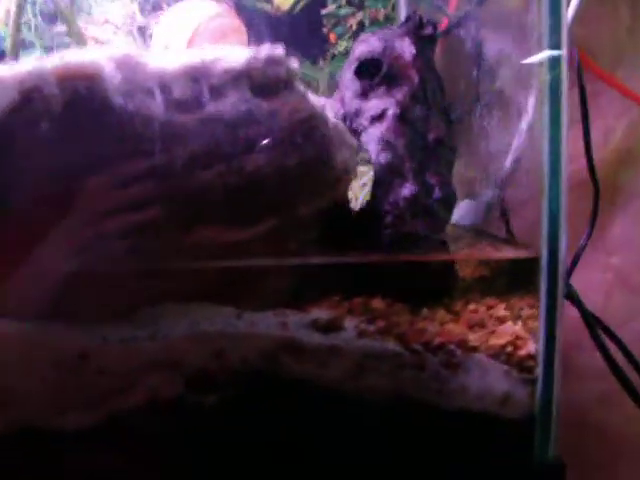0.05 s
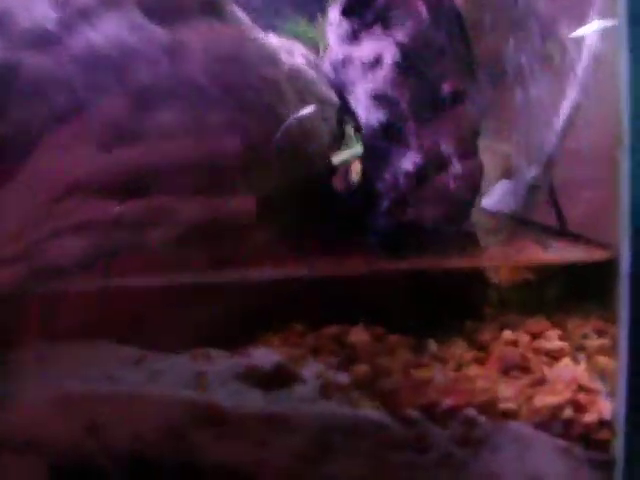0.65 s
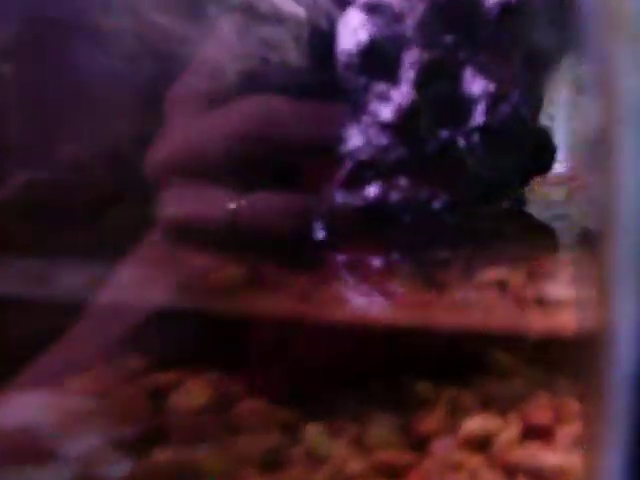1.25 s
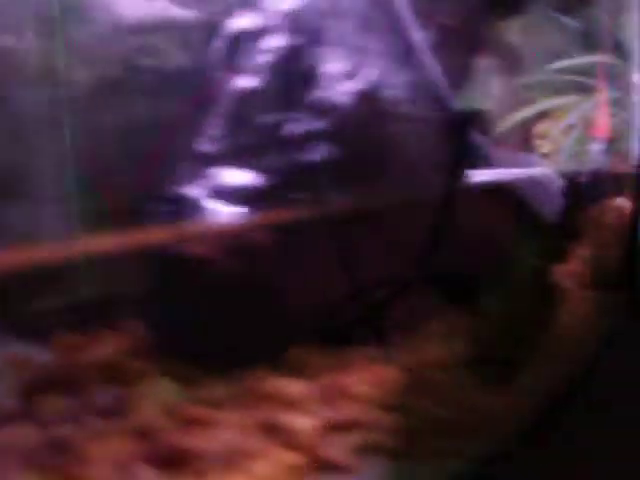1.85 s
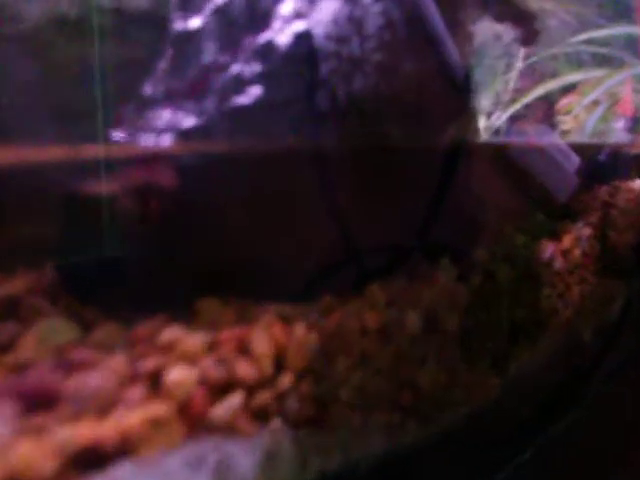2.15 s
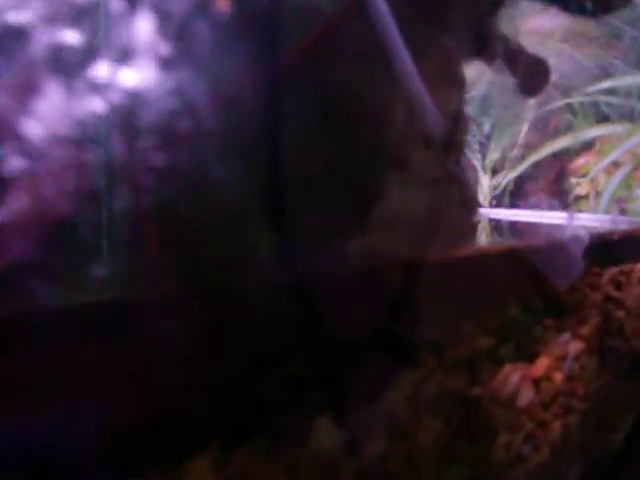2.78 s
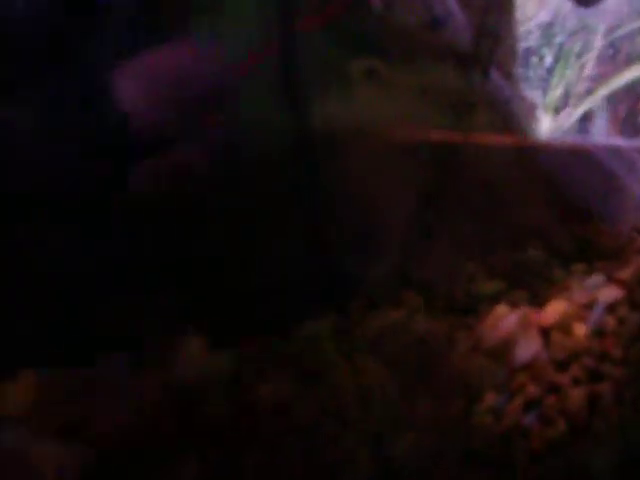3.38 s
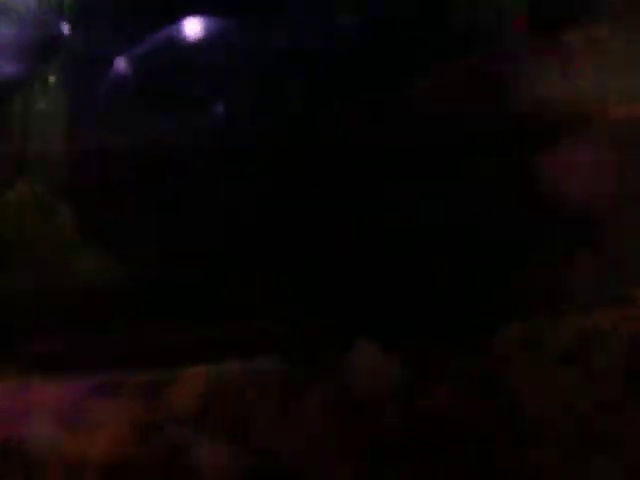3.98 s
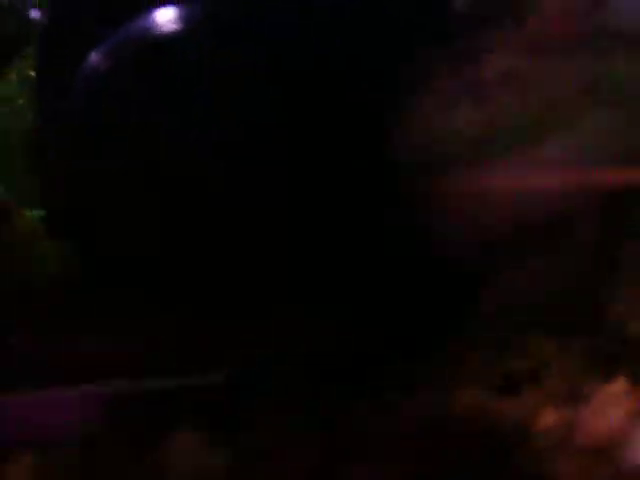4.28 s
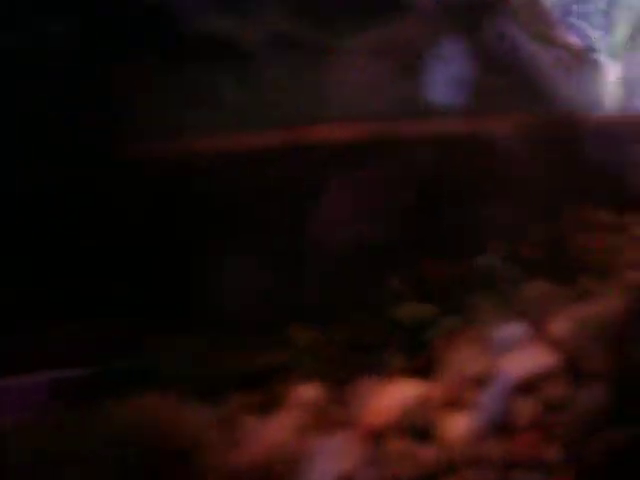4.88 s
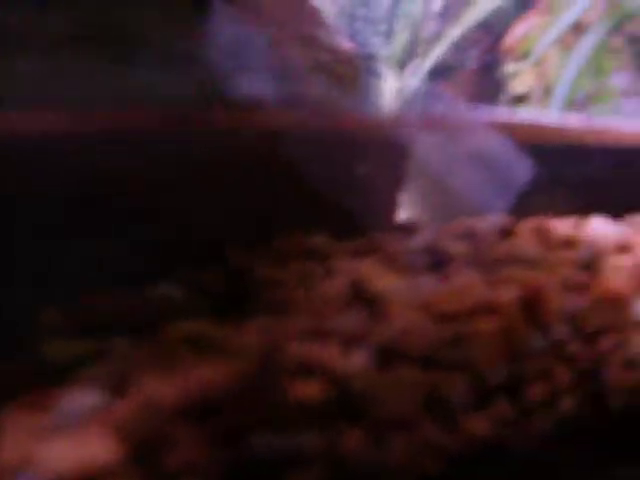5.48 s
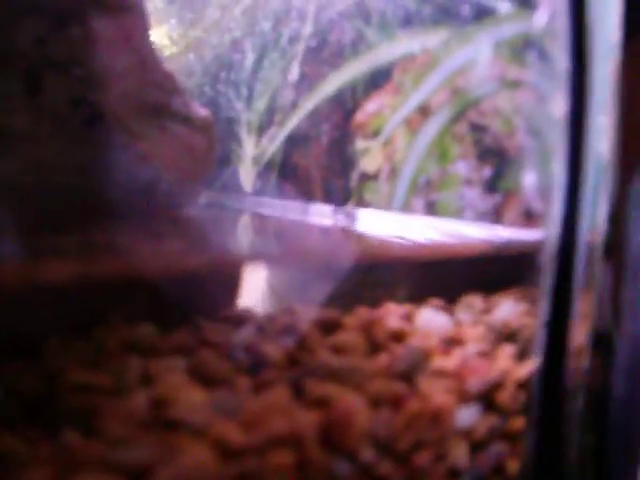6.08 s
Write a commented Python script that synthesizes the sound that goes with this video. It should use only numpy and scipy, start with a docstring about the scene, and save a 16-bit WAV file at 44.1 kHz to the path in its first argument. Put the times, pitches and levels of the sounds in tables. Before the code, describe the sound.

An aquarium pump hums low and steady indoors for about six seconds, while falling water makes a continuous soft, hissy trickle dotted with tiny bubble pings. Both are quiet and close. A light handling tick comes right at the start and another near 1 second. At about 1.4 and 1.5 seconds the handheld microphone bumps the glass tank twice, a sharp double knock with a thud, a crack and a very short ring. It is by far the loudest sound and slightly distorted. The hum swells over the first second or so and again a little near 5 seconds. A single drop snaps into the water at about 2.7 seconds. From 4 to 5.7 seconds there are a few faint ticks and soft finger rubs near the microphone. The trickle and hum continue to the end, and everything sounds slightly dull in the treble.

```python
"""Aquarium filter and a bumped camera

An aquarium pump hums indoors while a small camera moves along the tank. Falling water
hisses, and the air bubbles in it ring with little pings. Fingers rub the camera and its
case ticks in the hand. Twice the camera bumps the tank, which thuds, cracks and rings.
The bumps overload the camera's recorder, which also cuts off the highest treble."""
import sys
import numpy as np
from scipy import signal
from scipy.fft import rfft, irfft
from scipy.io import wavfile
from scipy.ndimage import uniform_filter1d

SR = 44100
rng = np.random.default_rng(int(sys.argv[2]) if len(sys.argv) > 2 else 0)


def persist_wave(psi):
    """Save psi, clipped to +-1, as 16-bit WAV."""
    counts = np.round(np.clip(psi, -1, 1) * 32767).astype(np.int16)
    wavfile.write(sys.argv[1], SR, np.atleast_2d(counts).T)


N = 270774
TIME = np.arange(N) / SR
MAINS_HZ = 60
BUBBLE_FADE = 1.3  # a bubble fades in BUBBLE_FADE / sqrt(pitch_hz) seconds

# Every fade_s below is the time a sound takes to drop by 60 dB.
# The notes in the pump's hum: multiple_of_mains, level_db
HUM_NOTES = [(1, -38), (2, -43.5), (3, -53.5), (4, -68.5), (5, -54.5), (7, -60)]
# Thin tones beside the hum: pitch_hz, level_db
WHINE_TONES = [(561, -69.5), (636, -56), (786, -56.5), (5012, -59.5)]
# The pump is louder when the camera is nearer: time_s, gain_db
PUMP_NEARNESS = [(0, -8.5), (.6, -6.5), (1.3, -.5), (3, .5), (4.4, 1), (5.1, 3.5), (6.14, 3)]
# The flutter of the pump's paddle wheel and housing: frequency_hz, level_db
FLUTTER_SPECTRUM = [(10, -16), (22, -16.5), (30, -7.5), (42, -23), (75, -19.5), (100, -7.5), (116, -14.5),
                    (130, -10), (155, -27.5), (400, -59)]
# How quickly the hum wavers: rate_hz, level_db
WAVER_SPECTRUM = [(1, 0), (8, 0), (25, -40), (100, -120)]
# The hiss of splashing water: frequency_hz, level_db
HISS_SPECTRUM = [(20, -20.5), (150, -8), (220, 1), (310, -1.5), (480, 3.5), (700, -3), (950, -0.5),
                 (1350, -3), (1700, -3.5), (2600, -5), (3400, -4), (4400, -5), (5100, -2.5)]
# The falling water is nearer at both ends of the move: time_s, gain_db
WATER_NEARNESS = [(0, -37), (1.6, -37.5), (4.4, -38), (5.1, -36.7), (6.14, -36)]
# How quickly the flow swells: rate_hz, level_db
SWELL_SPECTRUM = [(.3, -20), (1, 0), (3, 0), (10, -40), (60, -120)]
# Drops hitting the water nearby: start_s, level_db
NEAR_DROPS = [(.644, -17), (2.681, -7.5), (2.692, -19)]
# The clearest bubbles: start_s, level_db, pitch_hz
CLEAR_BUBBLES = [(0.1142, -30, 1100), (.8166, -33, 706), (.849, -25.5, 3490), (2.746, -28.5, 2420),
                 (2.884, -28.5, 2410), (3.114, -28.5, 1440), (3.277, -33, 912), (3.405, -32, 1100),
                 (4.137, -26.5, 1390), (4.412, -24.5, 3920), (5.066, -25, 2130), (5.229, -24, 5100),
                 (5.545, -29.5, 2160), (5.586, -24, 4320), (5.627, -30, 927), (5.949, -24, 3330)]
# Fingers shifting on the case: start_s, length_s, level_db, pitch_hz, width_octaves
FINGER_RUBS = [(4.542, 0.046, -30.5, 3280, 0.7), (4.606, 0.027, -33, 3060, 0.86),
               (4.851, 0.27, -40.5, 463, 0.24), (4.944, 0.074, -34.5, 3800, 1),
               (4.979, 0.088, -31.5, 2600, 1), (5.425, 0.1, -38.5, 800, 0.36),
               (5.705, 0.041, -37, 1980, 0.91)]
# Ticks of the case: start_s, level_db, pitch_hz, width_octaves, fade_s
CASE_TICKS = [(0.0747, -11, 4160, 0.44, 0.0074), (1.0519, -16, 1180, 0.25, 0.012),
              (3.958, -20, 4970, 0.22, .025), (4.062, -23, 3040, .7, .02), (5.184, -13.5, 1350, .9, 0.026),
              (5.429, -16, 4630, 0.41, 0.03), (5.489, -23, 362, 0.27, 0.027)]
# Two bumps, each with its rebounds: start_s, ring_db, thud_db, crack_db
TANK_HITS = [(1.4153, -1, -1.5, 7), (1.4228, -15.5, 1.5, 3), (1.4386, -27, -24, -9.5),
             (1.4793, -0.5, -11, -1), (1.4853, -20, -7.5, -4), (1.513, -42, -36, -22),
             (1.5228, -35, -34, -27)]
# The notes that tank and case ring with: pitch_hz, level_db, fade_s
TANK_NOTES = [(310, -1.5, 0.043), (380, -2.5, 0.065), (434.3, -11, 0.19), (485, -7.5, 0.074),
              (595, -31, 0.046), (755, -7, 0.09), (920, -14.5, 0.074), (1023, -10, 0.057),
              (1197, -24, 0.072), (1286, -9.5, 0.059), (1440, -15, 0.091), (1644, -4.5, 0.032),
              (2040, -23, 0.044), (2215, -12, 0.068), (2323, -19, 0.05), (2910, -22, 0.15),
              (3200, -20, 0.05)]
# The crack of a bump: frequency_hz, level_db
CRACK_SPECTRUM = [(60, -15), (200, 3), (900, -2.5), (1600, -2), (2400, -2.5), (3200, -5.5), (4200, -12),
                  (5500, -7), (8000, -15)]
# How long each part of the crack lasts: frequency_hz, fade_s
CRACK_FADES = [(200, 0.014), (1000, 0.054), (3000, 0.034), (5500, 0.022)]
# How the recorder cuts the treble: frequency_hz, gain_db
TREBLE_CUT = [(4950, 0), (5250, -4), (5500, -9.5), (5750, -14), (6000, -23), (6250, -42), (6600, -80)]


def gain_of(db):
    """Turns decibels into a number to multiply by."""
    return 10 ** (np.asarray(db) / 20)


def fade(t, fade_s):
    """A curve that dies away by 60 dB in fade_s seconds."""
    return gain_of(-60 * t / fade_s)


def unit_level(x):
    """Scales a sound to an average (rms) level of one."""
    return x / np.sqrt(np.mean(x ** 2) + 1e-20)


def look_up(table, hz):
    """Reads between the rows of a table, with frequency spaced in octaves."""
    row_hz, values = np.transpose(table)
    return np.interp(np.log(hz + 1), np.log(row_hz + 1), values)


def gain_curve(table):
    """Turns rows of time_s, gain_db into a gain for every sample."""
    return gain_of(np.interp(TIME, *np.transpose(table)))


def add(mix, start_s, sound):
    """Mixes a sound in at start_s."""
    part = mix[max(round(start_s * SR), 0):][:len(sound)]
    part += sound[:len(part)]


def shaped_noise(spectrum, size=N):
    """Noise with the given balance of low and high frequencies."""
    gains = gain_of(look_up(spectrum, np.fft.rfftfreq(size, 1 / SR)))
    return unit_level(irfft(rfft(rng.standard_normal(size)) * gains, size))


def add_echoes(x, echo_db, fade_s):
    """The glass walls and the room send back a blur of echoes."""
    t = TIME[:SR // 2]
    tail = rng.standard_normal(len(t)) * fade(t, fade_s) * (t > .002)
    return x + gain_of(echo_db) * signal.fftconvolve(x, tail / np.linalg.norm(tail))[:N]


def pump_hum(flutter_db=-49.0, waver_db=1.3):
    """The motor pulls once per mains cycle; its deep note changes most as the camera moves."""
    near = gain_curve(PUMP_NEARNESS)
    deep, *overtones = (-np.sqrt(2) * gain_of(db) * np.cos(2 * np.pi * MAINS_HZ * round(k) * TIME)
                        for k, db in HUM_NOTES)
    waver = shaped_noise(WAVER_SPECTRUM)
    buzz = sum(overtones) * gain_of(waver_db * waver)
    flutter = gain_of(flutter_db) * shaped_noise(FLUTTER_SPECTRUM)
    drift = 0.00055 * np.cumsum(waver) / SR  # the thin tones wander slightly in pitch
    whine = sum(gain_of(db) * np.sin(2 * np.pi * hz * (TIME + drift)) for hz, db in WHINE_TONES)
    return near * deep + np.sqrt(near) * (buzz + flutter) + np.sqrt(2) * whine


def splash_hiss(patchy_db=1.25):
    """Countless tiny splashes blur into a hiss with louder and softer patches."""
    hz, _, bands = signal.stft(rng.standard_normal(N), nperseg=512, noverlap=384, fs=SR)
    patches = uniform_filter1d(rng.standard_normal(bands.shape), size=6, axis=0)  # blur over pitch
    patches = unit_level(uniform_filter1d(patches, size=14, axis=1))  # blur over time
    bands = bands * gain_of(look_up(HISS_SPECTRUM, hz)[:, None] + patchy_db * patches)
    return unit_level(signal.istft(bands, nperseg=512, noverlap=384)[1][:N])


def bubble(hz, fade_s, rise=0.046):
    """A pocket of air rings and climbs in pitch as it nears the surface."""
    t = TIME[:SR // 12]
    onset = 1 - np.exp(-t * hz * 1.5)
    return onset * fade(t, fade_s) * np.sin(2 * np.pi * hz * (t + rise * t ** 2 / fade_s))


def bubble_crowd(per_s, spread_db, low_hz, high_hz, db_per_octave):
    """Bubbles form at random moments; the big, low ones ring longer."""
    out = np.zeros(N)
    starts = np.flatnonzero(rng.random(N) < per_s / SR)
    strength, pitch = rng.exponential(1, N), rng.random(N)
    for i in starts:
        hz = low_hz * (high_hz / low_hz) ** pitch[i]
        db = spread_db * min(strength[i], 4) + db_per_octave * np.log2(hz / low_hz)
        add(out, i / SR, gain_of(db) * bubble(hz, BUBBLE_FADE / np.sqrt(hz)))
    return unit_level(out)


def trickle(hiss_db=6.0, froth_db=-8.0, gurgle_db=-15, swell_db=0.47):
    """Water falls into the tank: hiss, froth and a soft gurgle swell slightly together."""
    swell = gain_of(swell_db * shaped_noise(SWELL_SPECTRUM))
    gurgle = bubble_crowd(per_s=16, spread_db=0.0, low_hz=775, high_hz=1443, db_per_octave=1.5)
    froth = bubble_crowd(per_s=420, spread_db=2.0, low_hz=550, high_hz=5200, db_per_octave=2.0)
    bubbles = gain_of(froth_db) * froth + gain_of(gurgle_db) * gurgle
    bubbles = add_echoes(bubbles, echo_db=-3, fade_s=0.2)
    return gain_curve(WATER_NEARNESS) * swell * (gain_of(hiss_db) * splash_hiss() + bubbles)


def water_pings(drop_hz=3620, drop_fade_s=0.006, spray_db=-33, spray_s=.036, pitch_scatter=0.082):
    """Drops snap and single bubbles ring close by; each sheds four faint bubbles."""
    out = np.zeros(N)
    drops = [(start_s, db, drop_hz, drop_fade_s) for start_s, db in NEAR_DROPS]
    bubbles = [(start_s, db, hz, BUBBLE_FADE / np.sqrt(hz)) for start_s, db, hz in CLEAR_BUBBLES]
    for start_s, db, hz, fade_s in drops + bubbles:
        add(out, start_s, gain_of(db) * bubble(hz, fade_s))
        for late, detune in rng.random(size=(4, 2)):
            spray_hz = hz * (1 + pitch_scatter * (2 * detune - 1))
            add(out, start_s + spray_s * late, gain_of(spray_db) * bubble(spray_hz, fade_s))
    return add_echoes(out, echo_db=-9, fade_s=0.096)


def case_noise(size, hz, octaves):
    """The camera's case rings with a broad band of noise around one pitch."""
    distance = np.log2((np.fft.rfftfreq(size, 1 / SR) + 1) / hz) / octaves
    phases = 2j * np.pi * rng.random(len(distance))
    return unit_level(irfft(np.exp(phases - distance ** 2 / 2), size))


def finger_rubs(grain_db=3):
    """Skin sticks and slips on the case: a short, grainy swell."""
    out = np.zeros(N)
    for start_s, length_s, db, hz, octaves in FINGER_RUBS:
        size = round(length_s * SR)
        slips = unit_level(uniform_filter1d(rng.standard_normal(N), size=90))[:size]
        rub = case_noise(SR, hz, octaves)[:size] * gain_of(grain_db * slips)
        add(out, start_s, gain_of(db) * unit_level(rub) * np.hanning(size))
    return out


def case_ticks(snap_db=-7):
    """The case ticks in the hand: a snap and a quickly dying rattle."""
    t, out = TIME[:4096], np.zeros(N)
    for start_s, db, hz, octaves, fade_s in CASE_TICKS:
        snap = np.sin(2 * np.pi * hz * t) * np.exp(-2 * hz * octaves * t)
        rattle = case_noise(len(t), hz, octaves) * fade(t, fade_s)
        tick = gain_of(snap_db) * snap / abs(snap).max() + rattle / abs(rattle).max()
        add(out, start_s, gain_of(db) * tick)
    return out


def tank_bumps(thud_hz=170, thud_fade_s=0.02, crack_trim_db=-1):
    """Each hit of the camera gives a low thud, a sharp crack and the ring of the tank."""
    t, out = TIME[:8192], np.zeros(N)
    ring = sum((-1) ** k * gain_of(db) * fade(t, fade_s) * np.sin(2 * np.pi * hz * t)
               for k, (hz, db, fade_s) in enumerate(TANK_NOTES))
    thud = fade(t, thud_fade_s) * np.sin(2 * np.pi * thud_hz * t)
    for start_s, ring_db, thud_db, crack_db in TANK_HITS:
        # the crack is a crowd of close notes, each band dying at its own speed
        hz, age_s, bands = signal.stft(shaped_noise(CRACK_SPECTRUM, len(t)), SR, nperseg=128)
        bands = bands * fade(age_s, look_up(CRACK_FADES, hz)[:, None])
        crack = gain_of(crack_trim_db) * signal.istft(bands, SR, nperseg=128)[1][:len(t)]
        add(out, start_s, gain_of(ring_db) * ring + gain_of(thud_db) * thud + gain_of(crack_db) * crack)
    return add_echoes(out, echo_db=-26.5, fade_s=.25)


def scene():
    """Pump, water and camera noises reach one microphone."""
    return (pump_hum() + trickle() + water_pings() + case_ticks() + finger_rubs() + tank_bumps())[None]


def record(dry, input_limit=.76, output_limit=.71, top_hz=16000):
    """The recorder flattens loud peaks, cuts the treble, then flattens what still sticks out."""
    overloaded = np.clip(dry, -input_limit, input_limit)
    treble_cut = gain_of(look_up(TREBLE_CUT, np.fft.rfftfreq(2 * N, 1 / SR)))
    dulled = irfft(rfft(overloaded, 2 * N) * treble_cut)[:, :N]
    flattened = np.clip(dulled, -output_limit, output_limit)
    top_filter = signal.firwin(255, top_hz, window=("kaiser", 9), fs=SR)  # removes sound above top_hz
    return signal.oaconvolve(flattened, top_filter[None], "same")


dry = scene()
out = record(dry)
persist_wave(out)
```